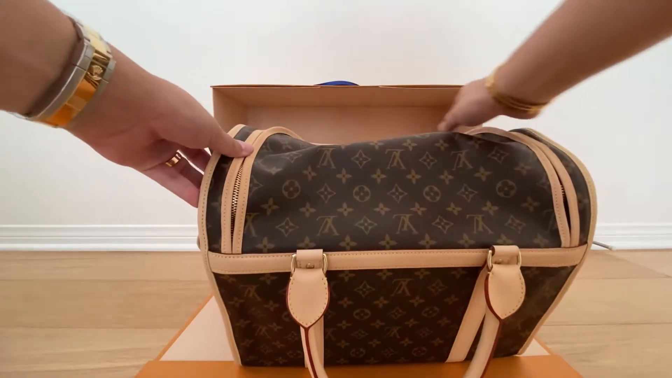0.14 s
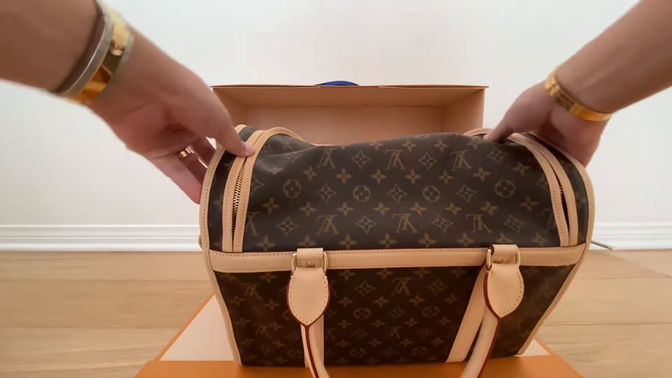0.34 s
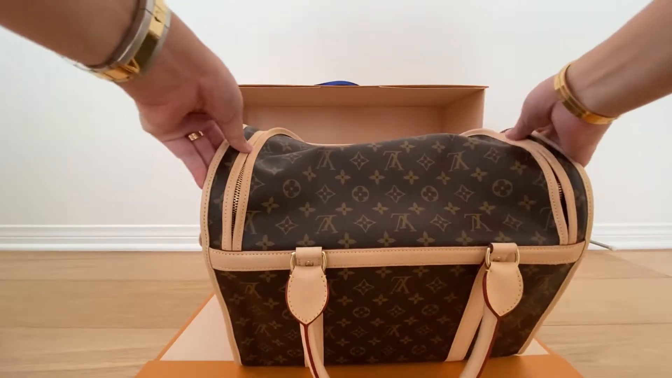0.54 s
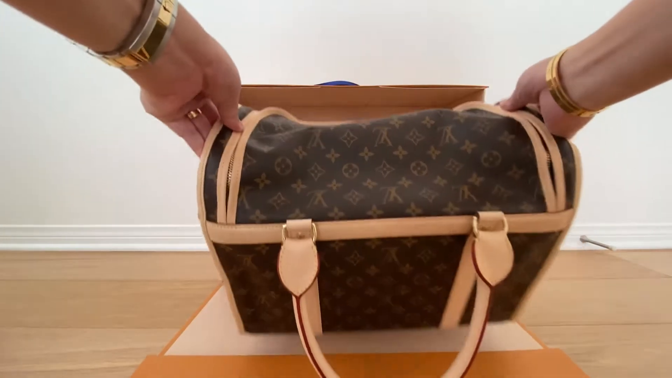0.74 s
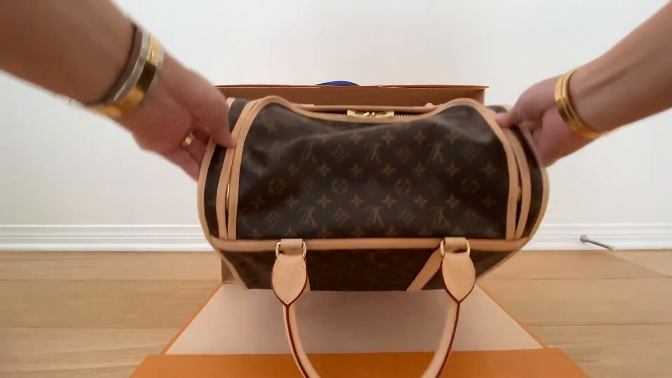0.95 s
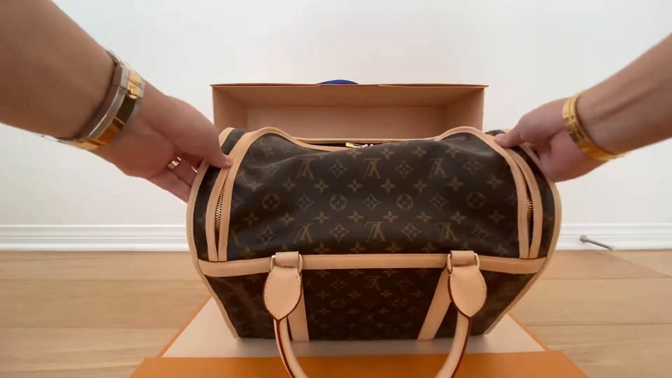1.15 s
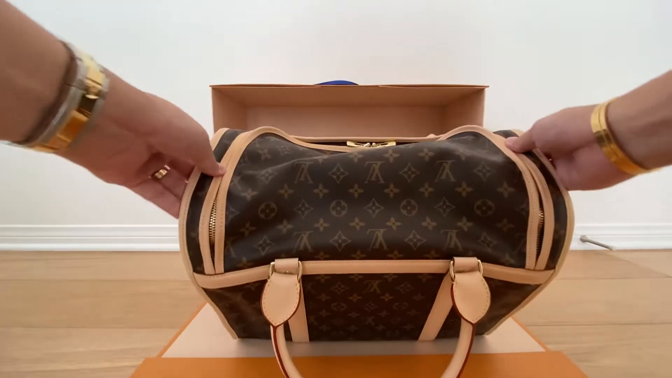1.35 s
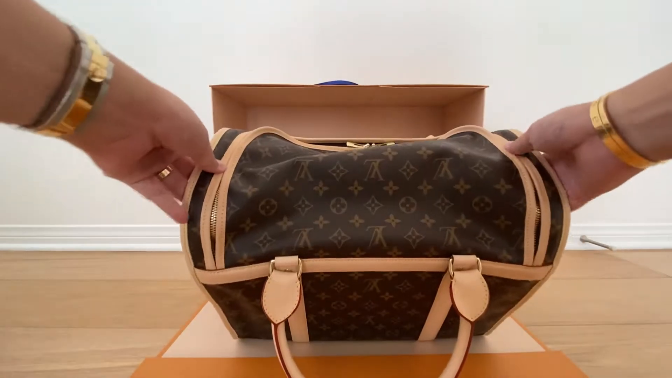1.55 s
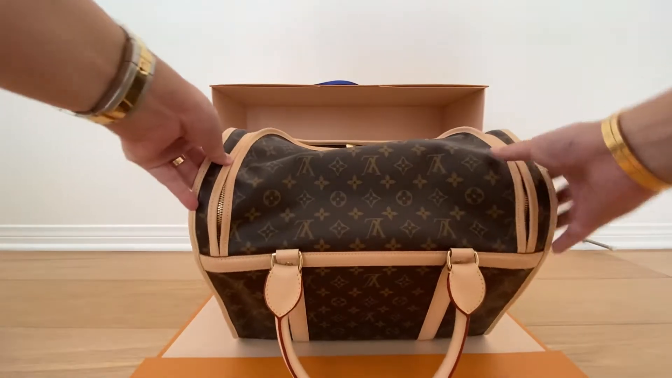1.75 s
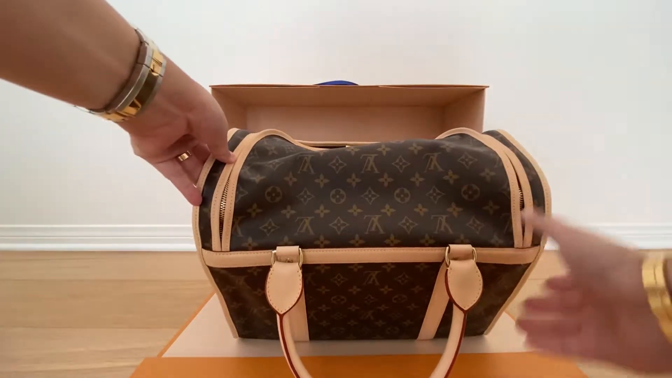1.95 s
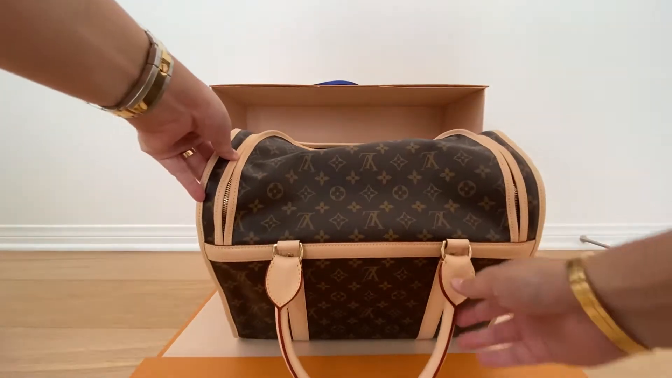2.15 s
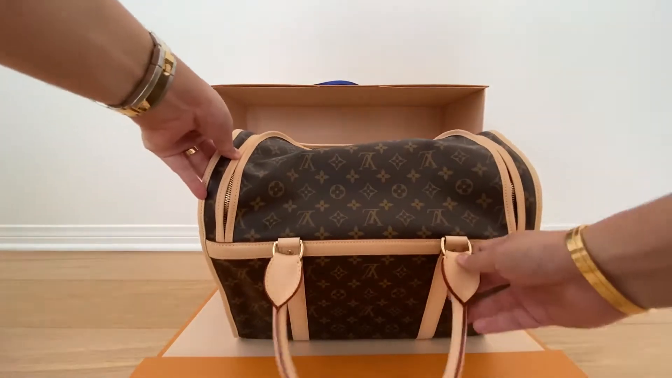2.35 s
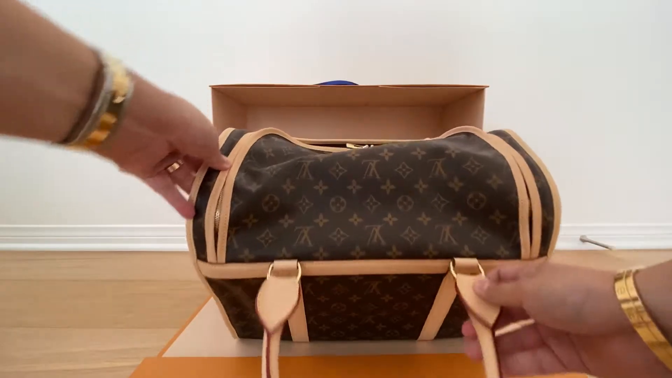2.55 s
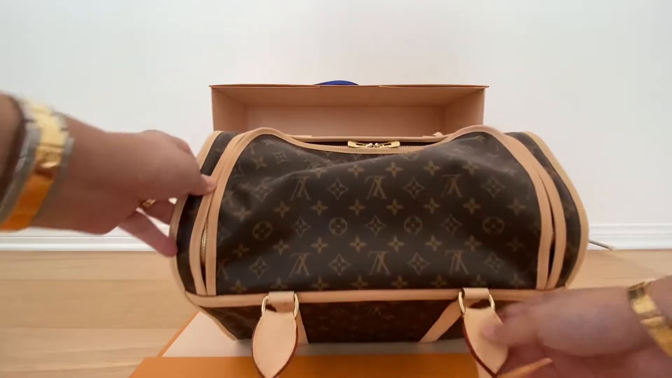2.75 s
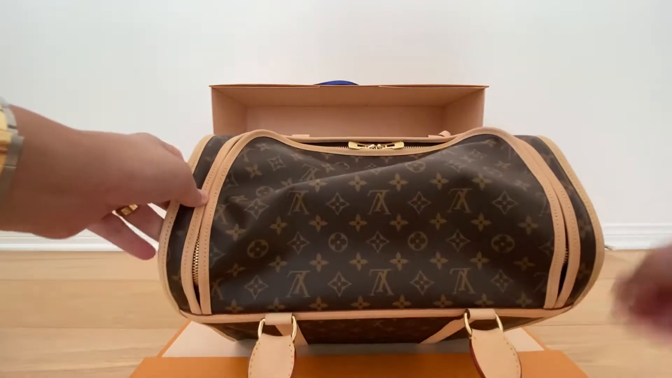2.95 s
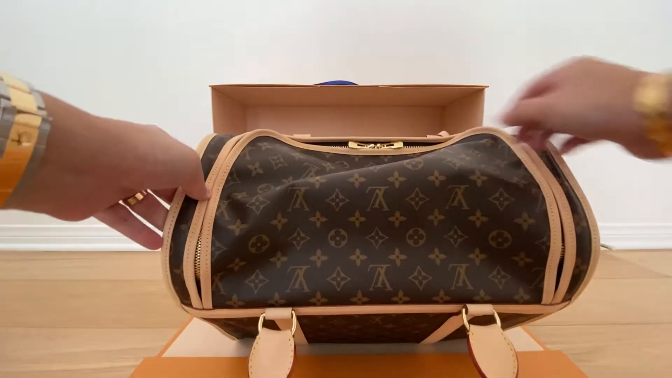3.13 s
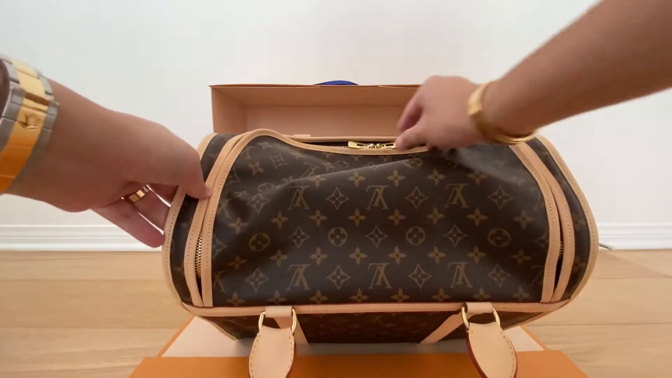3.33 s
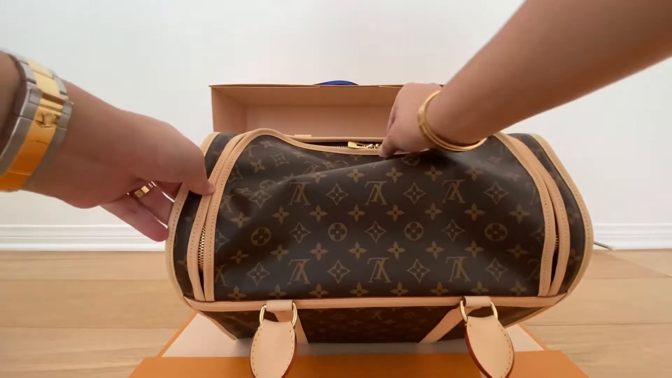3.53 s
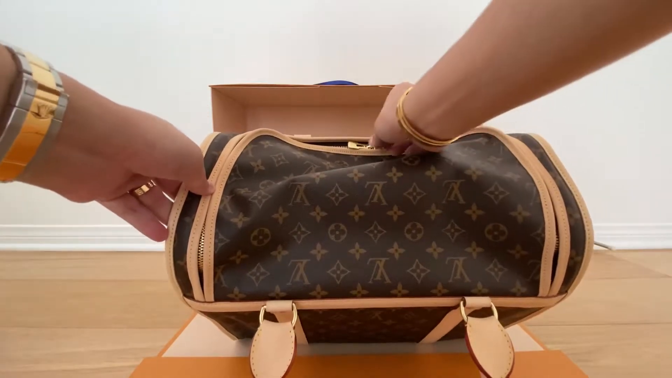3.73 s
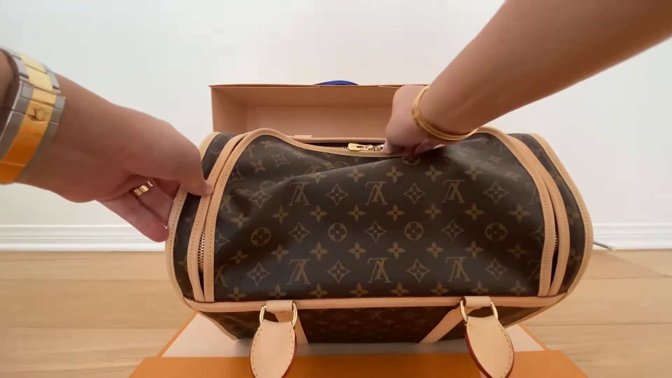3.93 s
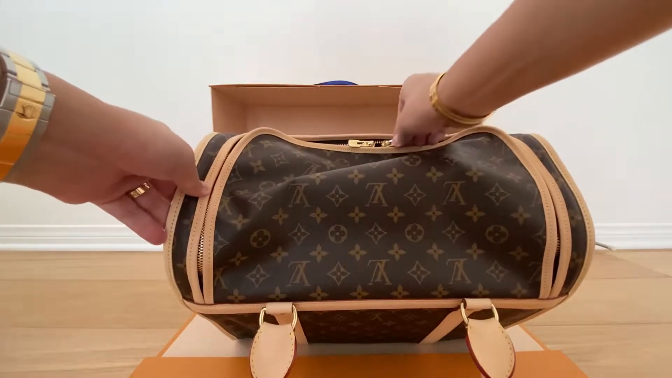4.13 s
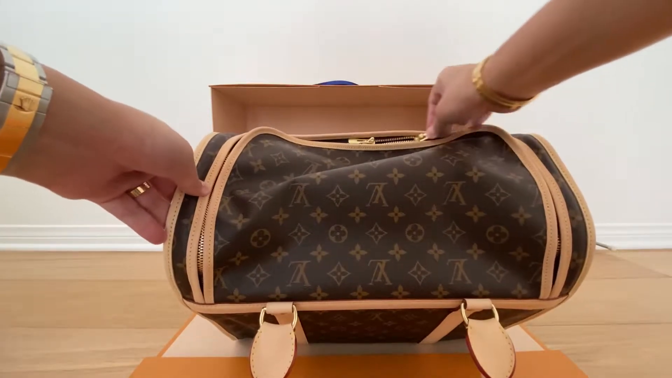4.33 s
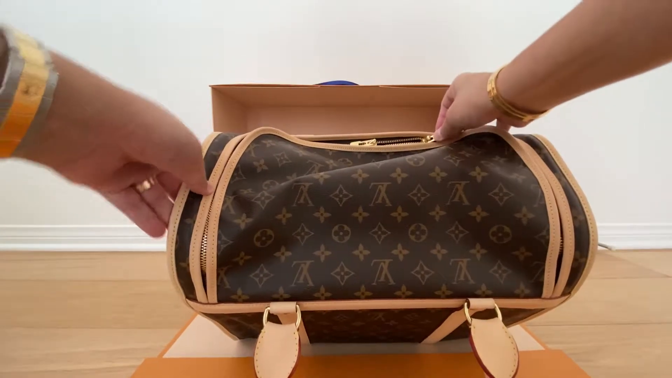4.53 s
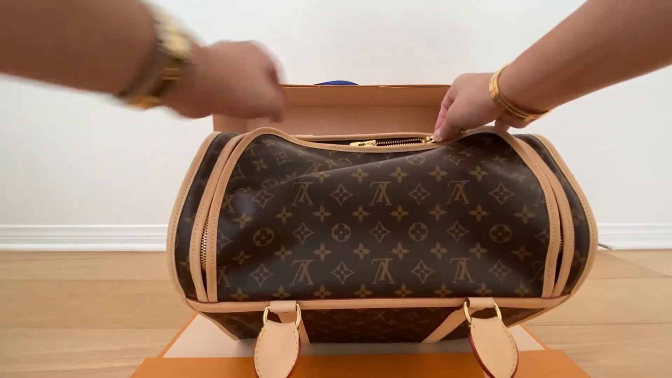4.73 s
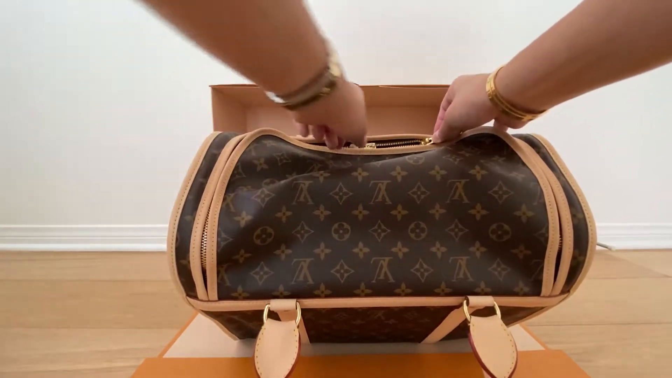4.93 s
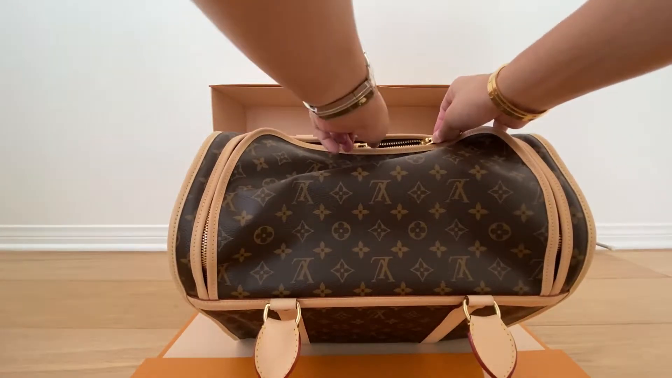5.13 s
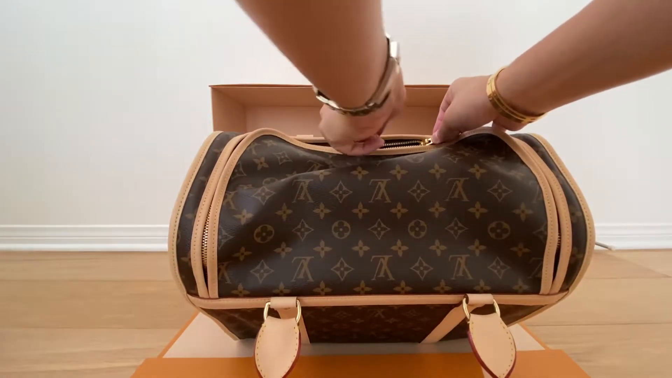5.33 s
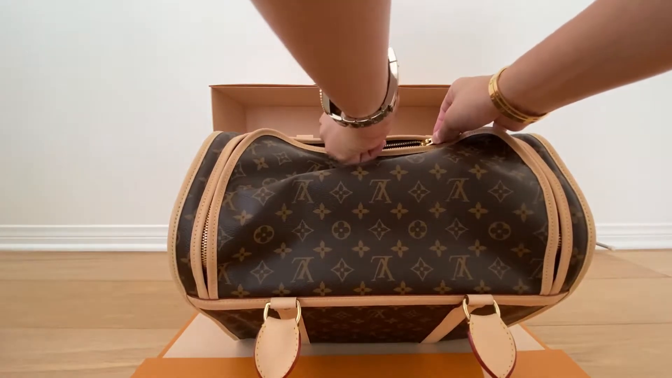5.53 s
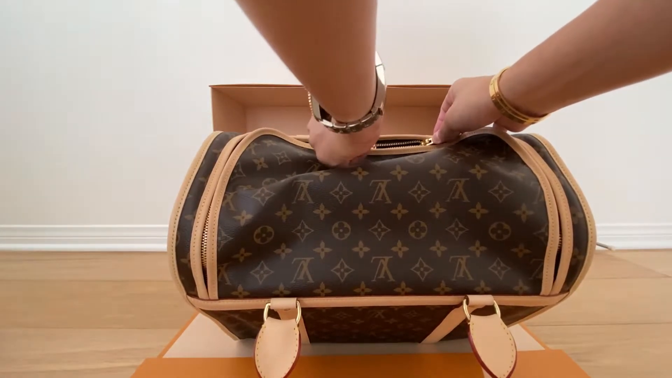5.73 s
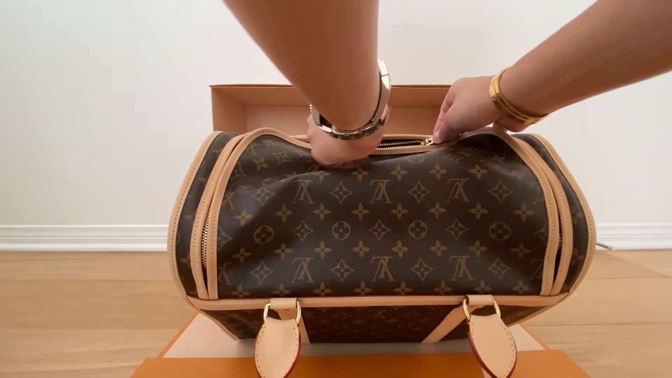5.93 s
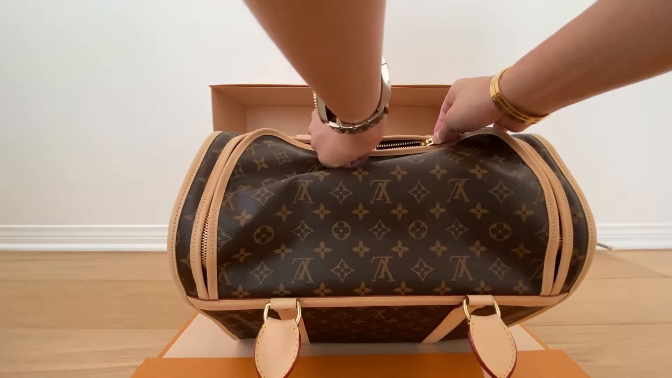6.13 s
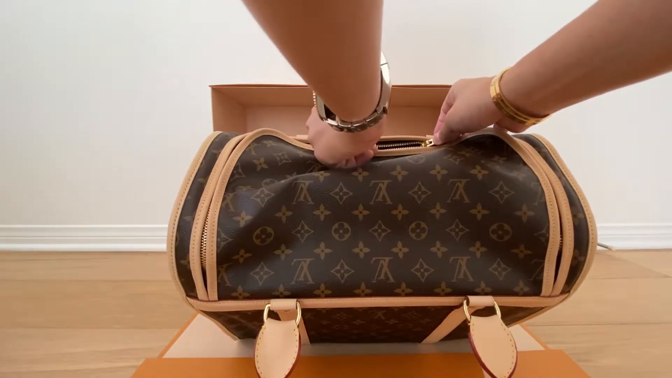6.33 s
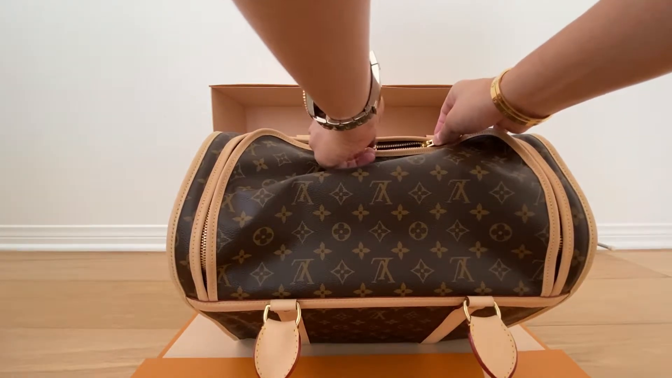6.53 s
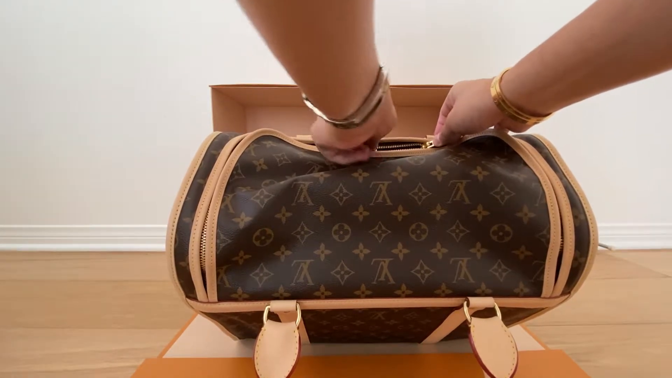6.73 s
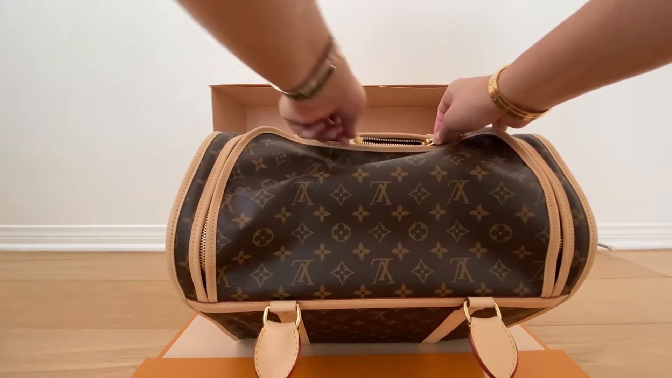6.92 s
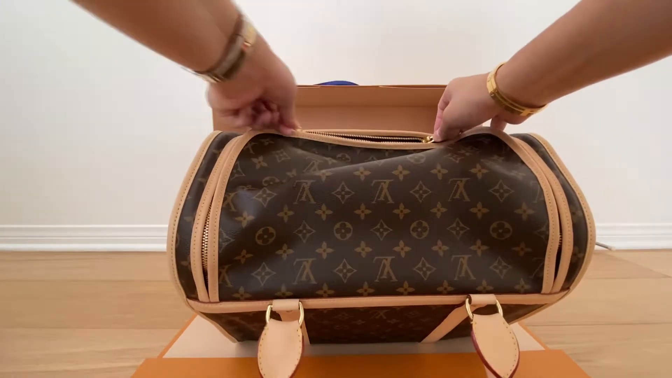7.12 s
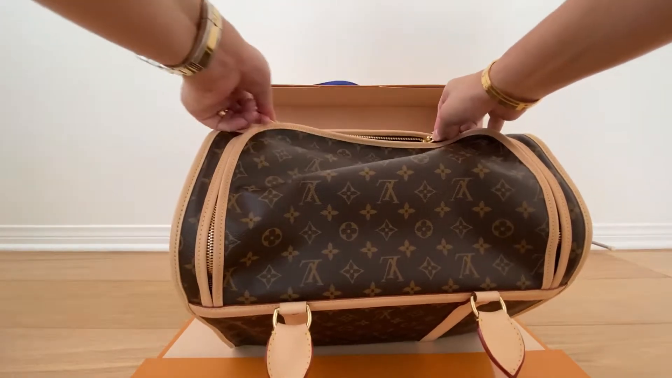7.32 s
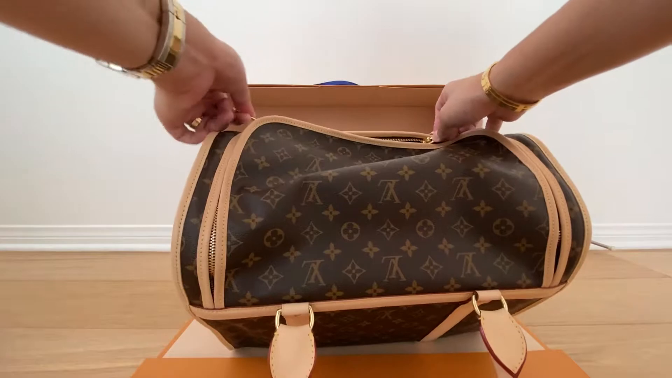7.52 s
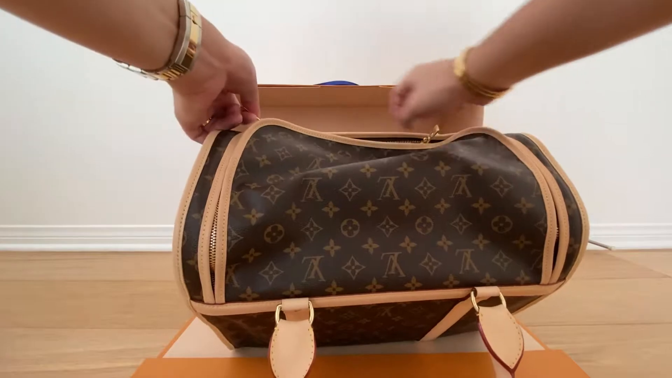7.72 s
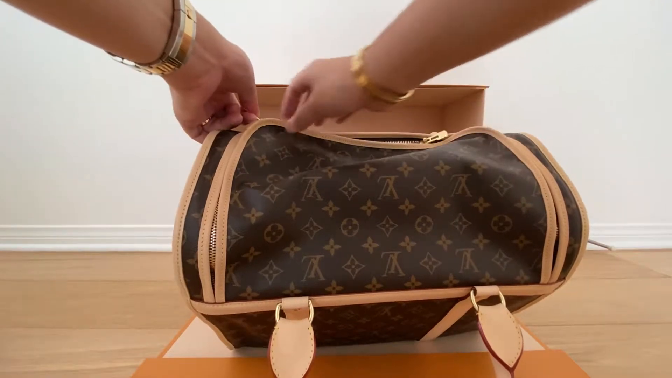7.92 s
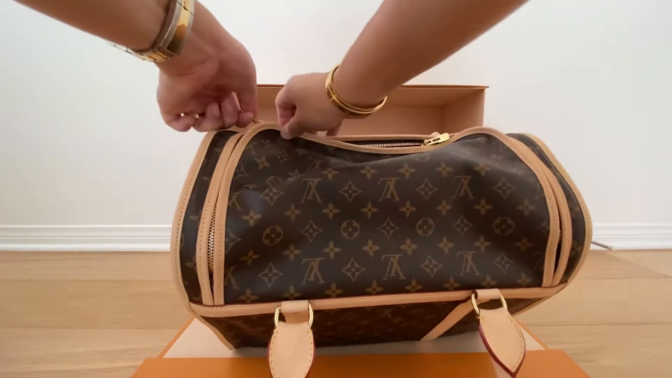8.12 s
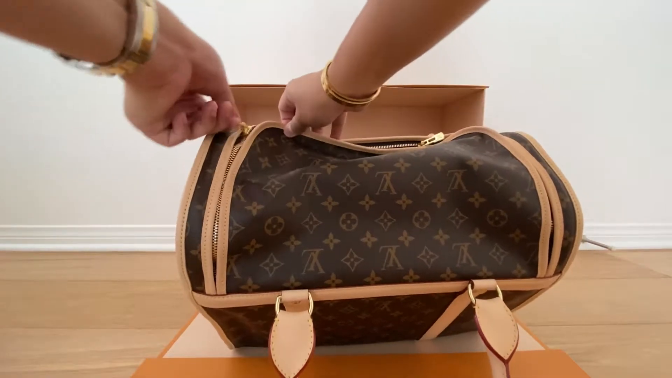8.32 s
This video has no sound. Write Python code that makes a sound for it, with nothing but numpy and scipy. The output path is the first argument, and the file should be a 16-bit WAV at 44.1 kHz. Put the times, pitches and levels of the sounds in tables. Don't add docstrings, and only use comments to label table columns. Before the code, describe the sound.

Close by in a bare, lightly echoing room, a stiff hollow bag is shifted on cardboard: soft bumps, two dull knocks as it tips and lands, then one sharp, ringing knock from a handle. Hands brush cloth and leather. A metal zipper is pulled slowly, teeth clicking, then after small brass ticks and pats come faster strokes and a last short one. Faint ventilation hums underneath.

```python
import sys
import numpy as np
from scipy import signal
from scipy.fft import rfft, irfft, next_fast_len
from scipy.io import wavfile
from scipy.ndimage import uniform_filter1d, map_coordinates

SR = 44100
rng = np.random.default_rng(int(sys.argv[2]) if len(sys.argv) > 2 else 0)


def generate_wav(sig):
    pcm = np.round(np.clip(np.atleast_2d(sig).T, -1, 1) * 32767).astype(np.int16)
    wavfile.write(sys.argv[1], SR, pcm)


def ratio_of_db(decibels):
    return 10 ** (np.asarray(decibels, float) / 20)


N = 373527
TIME = np.arange(N) / SR


def unit(x):
    return x / np.sqrt(np.mean(x ** 2) + 1e-20)


def along(points, hz):
    f, v = np.transpose(points)
    return np.interp(np.log(hz + 1), np.log(f + 1), v)


def gains(spans, fade=0.017):
    total = 0
    for rows in spans:
        s, *columns = np.transpose(rows)
        inside = np.minimum(TIME - s[0], s[-1] - TIME)
        edge = np.clip(inside / fade + 1, 0, 1)
        total = total + edge * ratio_of_db(np.array([np.interp(TIME, s, column) for column in columns]))
    return total


def bells(rows):
    out = np.zeros((len(rows[0]) - 2, N))
    for s, length, *db in rows:
        near = np.abs(TIME - s) < length
        fall_db = 11.0 * ((TIME[near] - s) / (length / 2)) ** 2
        out[:, near] += ratio_of_db(np.array(db)[:, None] - fall_db)
    return out


def wobble(rate):
    coarse = TIME[::16]
    knots = rng.standard_normal(int(N * rate / SR) + 4)
    return np.interp(TIME, coarse, map_coordinates(knots, [coarse * rate]))


def filtered(x, response):
    m = next_fast_len(len(x) + 8192)
    hz = np.fft.rfftfreq(m, 1 / SR)
    return irfft(rfft(x, m) * response(hz), m)[:len(x)]


def noise(spectrum, size=N):
    return unit(filtered(rng.standard_normal(size), lambda hz: ratio_of_db(along(spectrum, hz))))


def resonant(x, peaks):
    def response(f):
        total = 0
        for k, (centre, width, db) in enumerate(peaks):
            damping = 1j * f * width
            total = total + (-1) ** k * ratio_of_db(db) * damping / (centre * centre - f * f + damping)
        return total
    return filtered(x, response)


def ring(modes, attack, chance=1):
    longest = max(t60 for *_, t60 in modes)
    t = TIME[:min(SR // 2, round(1.5 * SR * longest))]
    total = 0
    for hz, db, t60 in modes:
        phase = 2 * np.pi * (hz * t + chance * rng.random())
        total = total + ratio_of_db(db - 60 * t / t60) * np.sin(phase)
    return (1 - np.exp(-t / attack)) * total


def add(track, s, sound):
    part = track[round(s * SR):][:len(sound)]
    part += sound[:len(part)]


# time in seconds, force in dB.
PULLS = [
    [(4.12, -89.5), (4.165, -60.5), (4.25, -61), (4.33, -58), (4.41, -59.5), (4.48, -75.5), (4.6, -72.5)],
    [(6.885, -64.5), (6.95, -59), (7.08, -53), (7.15, -59), (7.26, -63.5)],
    [(7.275, -59.5), (7.305, -52.5), (7.38, -62.5), (7.51, -61.5), (7.57, -95)],
    [(8.17, -66), (8.225, -53), (8.265, -58.5), (8.34, -57), (8.43, -64), (8.47, -49.5)],
]
# drum in dB, panel in dB, sway in dB.
COUPLING = [(5, -3, 4), (6, -1, -6.5), (5.5, 2, 4.5), (2, -2.5, 3.5)]
# time in seconds, teeth passed.
SLIDER_TRAVEL = [(4.12, -.9), (4.143, 0), (4.231, 6), (4.316, 14), (4.405, 22), (4.467, 26), (4.587, 32),
                 (6.889, 33), (6.979, 38), (7.105, 49), (7.207, 63), (7.316, 70), (7.383, 74), (7.46, 81),
                 (7.557, 86), (8.169, 87), (8.26, 94), (8.47, 113.5)]
# mode in Hz, width in Hz, level in dB.
DRUM_MODES = [(203, 54, 2.5), (279.7, 67, 3)]
DEEP_DRUM_DB = [-1, 2.5, -0.5, -0.5]
# mode in Hz, width in Hz, level in dB.
PANEL_MODES = [(546, 340, 5), (771, 39, 13), (1010, 1400, -9)]
# frequency in Hz, level in dB per Hz.
SWAY_COLOUR = [(30, -27), (50, -20.5), (70, -4.5), (110, -7.5), (150, -7.5), (220, -80.5)]


def zipper():
    spans = []
    for rows, coupling_db in zip(PULLS, COUPLING):
        spans.append([(s, db, *(db + np.array(coupling_db))) for s, db in rows])
    click, drum, panel, sway = gains(spans)
    travel = np.interp(TIME + 0.0025, *np.transpose(SLIDER_TRAVEL))
    teeth_per_s = uniform_filter1d(np.gradient(travel) * SR, size=1300)
    usual_teeth_per_s, drum_db_per_octave = 46, 1
    drum = drum * ratio_of_db(drum_db_per_octave * np.log2(np.clip(teeth_per_s, 30, None) / usual_teeth_per_s))
    sway = np.interp(TIME - 0.023, TIME, sway)

    passed = travel + 0.12 * wobble(60)
    teeth = np.diff(np.maximum.accumulate(np.floor(passed)), prepend=-1)
    push = unit(teeth * ratio_of_db(1.0 * rng.standard_normal(N)))
    push = push + 1.1 * rng.standard_normal(N)
    push = push + 0.41 * np.sin(4 * np.pi * passed)

    deep = ratio_of_db(np.interp(TIME, [rows[2][0] for rows in PULLS], DEEP_DRUM_DB))
    boom = deep * unit(resonant(push, DRUM_MODES[:1])) - unit(resonant(push, DRUM_MODES[1:]))
    top_panel = unit(resonant(resonant(push, PANEL_MODES), [(790, 600, 0)]))
    body = 0.77 * drum * boom + panel * top_panel
    return chatter(click) + pings() + ratio_of_db(-5.0) * body + ratio_of_db(-3.5) * sway * noise(SWAY_COLOUR)


# time in seconds, peak in dB.
TEETH = [
    [(4.1096, -65), (4.118, -72.5), (4.1407, -64.5), (4.1559, -67), (4.1661, -54), (4.1834, -53.5),
     (4.2011, -57), (4.2146, -54.5), (4.2294, -49), (4.2402, -49.5), (4.2475, -47), (4.2571, -50.5),
     (4.2677, -48), (4.2752, -49), (4.2857, -50), (4.2977, -54.5), (4.3059, -45.5), (4.3141, -45.5),
     (4.3229, -48.5), (4.334, -55.5), (4.3522, -47), (4.3674, -48), (4.3774, -47), (4.3915, -55),
     (4.4025, -43.5), (4.4175, -56), (4.4268, -60.5), (4.4378, -62), (4.4448, -61), (4.4651, -66.5),
     (4.4822, -60), (4.5103, -63), (4.5239, -61.5), (4.5523, -73), (4.5642, -62), (4.5768, -74),
     (4.5849, -68)],
    [(6.8865, -55), (6.9034, -64), (6.9173, -56), (6.94, -64), (6.9774, -54), (6.9875, -49), (7.0005, -51),
     (7.0216, -46.5), (7.0389, -48), (7.0586, -42.5), (7.0749, -46), (7.0968, -44), (7.1111, -51.5),
     (7.1288, -60), (7.14, -62.5), (7.1499, -54), (7.1572, -65), (7.1647, -57), (7.1833, -57),
     (7.1919, -48), (7.2003, -60), (7.2217, -65), (7.2432, -60)],
    [(7.2626, -59), (7.2779, -64), (7.2903, -52), (7.3017, -55), (7.3136, -59), (7.325, -49),
     (7.3341, -48.5), (7.3507, -48.5), (7.3662, -44.5), (7.3808, -49.5), (7.3971, -50.5), (7.4154, -59),
     (7.428, -47), (7.4391, -50), (7.4584, -58), (7.4794, -48), (7.4941, -54), (7.517, -67), (7.5324, -70),
     (7.5394, -73.5), (7.5566, -74), (7.5689, -74.5)],
    [(8.1668, -76), (8.1799, -64.5), (8.1868, -54), (8.1981, -73), (8.2098, -60), (8.2206, -43),
     (8.2366, -46), (8.2448, -45), (8.2584, -42.5), (8.2688, -44.5), (8.2782, -47.5), (8.2984, -46),
     (8.3141, -52), (8.3275, -59), (8.3358, -60), (8.3514, -50), (8.3657, -63), (8.3829, -59),
     (8.3922, -53), (8.4036, -57), (8.4174, -60), (8.4286, -49.5)],
]
# frequency in Hz, level in dB per Hz.
METAL_COLOUR = [(530, 29), (900, 10), (1120, 1), (1470, -1), (2390, -4), (2730, -8), (2960, -6),
                (4360, -11), (7140, -11), (14200, -16), (16000, -15)]
PARTS_HZ = [1500, 3500, 6000, 12400]
TOOTH_SHARE_DB = [-4.5, -7, 0, -5]
STROKE_COLOUR = [(-1.4, -1.4, -2, 4), (-0.34, 0.97, -2.5, 4), (1, -0.69, -5.5, -2), (-1.5, 0.82, -0.5, 0.5)]
SCRAPE_DB = [-7.5, -1.5, -6, -6.5]


def chatter(pull):
    t = TIME[:2000]
    burst = (1 - np.exp(-t / 0.00066)) * ratio_of_db(-60 * t / 0.024)
    burst = burst / burst.max()
    s, db = np.concatenate(TEETH).T
    places = np.round(s * SR).astype(int)
    scatter_db = 2.5 * rng.standard_normal((len(s), len(PARTS_HZ)))
    middles = [np.mean(rows, axis=0)[0] for rows in PULLS]
    grit_db = 1.5 * wobble(350)
    scrape = pull * ratio_of_db(np.interp(TIME, middles, SCRAPE_DB) + grit_db)

    metal = noise(METAL_COLOUR)
    bands = [filtered(metal, lambda hz: np.exp(-(np.log(hz / centre + 1e-9) / 0.6) ** 2)) for centre in PARTS_HZ]
    out = 0
    for band, share_db, colour_db, own_db in zip(bands, TOOTH_SHARE_DB, np.transpose(STROKE_COLOUR), scatter_db.T):
        hits = np.bincount(places, ratio_of_db(db + 1 + share_db + own_db), N)
        clicks = signal.oaconvolve(hits, burst)[:N]
        level = np.hypot(clicks, scrape * ratio_of_db(1.3 * wobble(40)))
        out = out + level * ratio_of_db(np.interp(TIME, middles, colour_db)) * band
    return out / np.std(sum(bands))


PING_HZ = [8200, 6950, 6330, 5470]
PING_DB = [-11, -11, -2.5, -3]


def pings():
    out, t = np.zeros(N), TIME[:1500]
    spread, t60 = 0.12, 0.015
    for rows, hz, ring_db in zip(TEETH, PING_HZ, PING_DB):
        chances = rng.standard_normal((len(rows), 2))
        for (s, db), (bend, own) in zip(rows, chances):
            pitch = hz * np.exp(spread * bend)
            tone = np.sin(2 * np.pi * pitch * t) * (1 - np.exp(-t / 0.00061))
            add(out, s, ratio_of_db(db + ring_db + 1.9 * own - 60 * t / t60) * tone)
    return out


# start in seconds, peak in dB, rise of the blow in seconds, ring in dB, thud in dB.
KNOCKS = [
    (0.9733, -29.5, 0.001, -4, -33.5),
    (1.1195, -27, 0.0013, 2.5, -27),
    (2.6521, -18, 0.0006, 4, -38),
    (5.6237, -34, 0.00094, -9, -48.5),
]
# frequency in Hz, level in dB per Hz.
BLOW_COLOURS = [
    [(210, -27), (350, -11), (653, -9), (1240, -7), (1380, -2), (2750, -27), (13400, -52), (16000, -70)],
    [(210, -24), (350, -10.5), (791, -17.5), (1480, -17), (2500, -18), (2940, -28.5), (3450, -23.5),
     (16000, -45.5)],
    [(210, -35.5), (350, -20), (664, -8.5), (871, -16), (1700, -8), (2000, -11.5), (4180, -14.5),
     (12000, -37), (16000, -42)],
    [(210, -40), (350, -18), (791, -5), (1680, -15), (2030, -6.5), (3730, -18.5), (7080, -4), (16000, -21)],
]
# mode in Hz, level in dB, t60 in seconds.
KNOCK_RINGS = [
    [(1120, 6, 0.02), (1410, 8, 0.014), (2230, 5, 0.015)],
    [(1530, 9, 0.022), (2150, 1.5, 0.024), (2920, 2, 0.022), (4120, 0, 0.014), (4600, -6.5, .02)],
    [(614, -8.5, 0.02), (1230, -13, 0.022), (1500, 2, 0.024), (1630, 1.5, .026), (1788, -6, 0.018),
     (2200, -7, 0.02), (2530, -8, .025), (2962, -7.5, .022), (4120, -7.5, 0.0066), (1250, -32, 0.5),
     (1440, -36, .4), (1560, -35.5, .5)],
    [(6040, 11, 0.02), (4440, 0, 0.018), (8900, 0, .02), (7500, -14, 0.1), (7400, -22.5, .35),
     (6900, -23, .4), (5990, -20, 0.54), (6120, -22, .3), (10300, 13, 0.027)],
]
# frequency in Hz, level in dB per Hz.
ANSWER_COLOURS = [
    [(180, -16), (300, 0), (645, -9.5), (1390, -3), (2000, -18), (2250, -17.5), (12700, -50),
     (16000, -57.5)],
    [(180, -30), (300, 4), (701, -9.5), (1300, -9), (1510, -8), (4670, -18.5), (13300, -37.5), (16000, -41)],
    [(180, -37), (300, -2), (366, -20), (462, -4.5), (1120, -20), (1230, -3.5), (1560, -4), (1970, -9),
     (14000, -45), (16000, -61.5)],
    [(250, -38), (400, -1), (850, -7.5), (3500, -19.5), (5800, -11.5), (6100, -10), (6500, -22), (6900, -3),
     (7700, -4.5), (8200, -13.5), (16000, -21.5)],
]
ANSWER_DB = [-43, -38, -34, -47.5]
REBOUND_S = [.002, .003, .0032, 0.0014]
REBOUND_DB = [3, 5, 1, 3]
# mode in Hz, level in dB, t60 in seconds.
THUD_MODES = [(64.5, -8.5, 0.19), (105, -8.5, 0.097), (194.2, 3.5, 0.061), (281, 4.5, 0.0575)]


def knocks():
    out, thuds, t = np.zeros(N), np.zeros(N), TIME[:SR // 2]
    nearest_wall = (0.014, -20.5)  # seconds, dB
    for (s, db, rise, ring_db, thud_db), colour, modes, echo, echo_db, again_s, again_db in zip(
            KNOCKS, BLOW_COLOURS, KNOCK_RINGS, ANSWER_COLOURS, ANSWER_DB, REBOUND_S, REBOUND_DB):
        shape = (t / rise) ** 0.34 * np.exp(-t / (1.1 * rise + 0.0017))
        blow = shape * noise(colour, size=len(t))
        for after_s, gain_db in ((0, 0), (again_s, again_db), nearest_wall):
            add(out, s + after_s, ratio_of_db(db - 5.0 + gain_db) * blow)
            add(out, s + after_s, ratio_of_db(db - 6.0 + gain_db + ring_db) * ring(modes, attack=rise, chance=0))
        add(out, s + 0.0082, ratio_of_db(echo_db) * answer(echo))
        thud = ratio_of_db(thud_db - 3.0) * ring(THUD_MODES, attack=0.0026)
        add(thuds, s + 0.004 + 2.5 * rise, thud)
    return out, thuds


# start in seconds, peak in dB, mode in Hz, t60 in seconds.
BUMPS = [(0.09, -37, 274, 0.016), (0.151, -45.5, 278, 0.032), (0.389, -45, 82.6, 0.13),
         (0.46, -53, 232, 0.075), (0.867, -51, 362, 0.058), (1.13, -36.5, 69.5, 0.1),
         (1.25, -57, 77.4, 0.29), (2.579, -59.5, 385, 0.27), (3.254, -49, 250, 0.2),
         (3.325, -45.5, 203, 0.14), (3.612, -55.5, 241, 0.12), (3.788, -54, 390, 0.076),
         (4.575, -45.5, 240, 0.038), (4.666, -64.5, 337, 0.11), (4.923, -57.5, 206, 0.072),
         (5.617, -46.5, 258, 0.15), (5.965, -49.5, 284, 0.12), (6.122, -59, 380, 0.13),
         (6.281, -47.5, 242, 0.065), (6.484, -44.5, 254, 0.057), (6.541, -56.5, 379, 0.11),
         (6.858, -56.5, 221, 0.16), (7.714, -53.5, 86.6, 0.1), (7.944, -61, 367, 0.089)]


def bumps():
    out = np.zeros(N)
    for s, db, hz, t60 in BUMPS:
        modes = [(hz, 0, t60), (hz * 1.37, -7, t60 * 0.52)]
        add(out, s, ratio_of_db(db + 1.0) * ring(modes, attack=0.0011))
    return out


# time in seconds, effort in dB.
HANDLING = [(0, -66.5), (.5, -75.5), (.93, -66), (1.35, -83), (1.66, -72.5), (1.95, -76.5), (2.55, -71),
            (3.1, -74.5), (3.9, -73.5), (4.7, -77), (5.2, -71), (5.55, -76), (6, -73), (6.35, -79),
            (6.85, -66.5), (7.6, -65.5), (7.93, -83), (8.2, -70)]
# middle in seconds, length in seconds, creak in dB, sway in dB.
SQUEEZES = [(.03, 0.17, -74, -76), (.46, 0.29, -63, -67), (1.33, 0.5, -65.5, -69), (2.22, 0.35, -93, -77),
            (3.36, 0.2, -64, -66), (3.8, 0.25, -70, -90), (4.1, 0.094, -69, -79), (4.98, 0.14, -70, -88.5),
            (5.3, 0.12, -73, -93), (6.02, 0.1, -67, -75.5), (6.5, 0.1, -62, -77.5), (7.75, 0.23, -66, -89),
            (8.04, 0.19, -61, -71.5)]
# middle in seconds, length in seconds, level in dB.
BRUSHES = [(0.375, 0.14, -68), (0.552, 0.17, -63.5), (.87, 0.14, -58), (1.03, .16, -81),
           (1.664, 0.52, -70.5), (2.318, 0.11, -64), (3.265, 0.033, -68), (3.363, 0.128, -69),
           (3.5, 0.42, -78), (4.03, 0.12, -76), (6.02, 0.12, -80), (6.576, 0.1, -69), (8.06, 0.2, -69)]
# frequency in Hz, level in dB per Hz.
CLOTH_COLOUR = [(410, -52), (700, 7.5), (1120, -3), (1280, 1), (2220, -1), (2800, -4), (7590, -6.5),
                (14200, -22), (16000, -23.5)]
# middle in seconds, length in seconds, level in dB.
WHISKS = [(.55, .12, -72), (1.57, .08, -74), (1.67, .1, -70), (2.8, 0.22, -72), (3.62, 0.087, -74),
          (6.57, .1, -77), (6.89, .05, -70), (8.05, 0.11, -70)]
# frequency in Hz, level in dB per Hz.
LEATHER_COLOUR = [(2500, -21), (6000, -4.5), (9000, -5), (14000, -0.5), (16000, -4.5)]


def hands():
    effort, = gains([HANDLING])
    creak, sway = effort * ratio_of_db([[-1], [-2]]) + bells(SQUEEZES)
    rub = effort + bells(BRUSHES)[0]
    grains = unit(ratio_of_db(1.4 * wobble(97) + 1.4 * wobble(15)) * noise(CLOTH_COLOUR))
    lumps = unit(ratio_of_db(5.9 * wobble(25)) * resonant(rng.standard_normal(N), DRUM_MODES))
    whisk = bells(WHISKS)[0] * ratio_of_db(1.9 * wobble(60)) * noise(LEATHER_COLOUR)
    return whisk + ratio_of_db(-5.0) * rub * grains + creak * lumps + sway * noise(SWAY_COLOUR)


# start in seconds, peak in dB, ring in Hz, level below 2.5 kHz in dB.
TAB_TICKS = [(1.3284, -58.5, 7200, -12), (1.372, -62, 7100, -10), (1.38, -65, 14060, -15),
             (1.7972, -62, 1620, -10), (3.6053, -54.5, 1560, -1.5), (3.9917, -53.5, 2430, 2.5),
             (4.9947, -60, 6090, 6.5), (5.1, -55.5, 10400, -11), (5.0995, -56, 3060, 7.5),
             (5.238, -70, 9940, -11.5), (5.282, -64, 4000, -15), (5.325, -69, 9900, -6),
             (5.3284, -61.5, 5940, 0), (5.6145, -48.5, 10000, 10), (5.9698, -58.5, 6080, 4),
             (6.172, -73, 7050, -12), (6.305, -61.5, 1700, 9.5), (6.2876, -52, 2200, 6),
             (6.531, -55, 2140, 9.5), (6.545, -51, 4200, 6.5), (6.8076, -56, 4100, -5),
             (6.847, -67, 12100, -2.5), (6.8695, -44.5, 2060, 0), (7.7133, -51, 2280, 0.5),
             (7.722, -70, 10000, -6), (7.9798, -56, 4200, 3), (8.4525, -44.5, 4820, -18.5)]
RING_TICKS = [(.0927, -61, 3380, 10.5), (.1471, -57, 1870, 5), (.8646, -47, 2410, -2),
              (1.113, -51, 3760, 12), (1.9577, -56, 1710, -3), (2.127, -68, 1750, 1),
              (2.1534, -60.5, 1760, .5), (2.496, -62, 4060, -13), (2.626, -63.5, 1500, 17),
              (2.6415, -43, 3900, -2), (2.647, -37, 3900, -8), (2.775, -57, 2510, -2), (2.8, -51, 2250, -9),
              (2.89, -57, 1570, 1), (4.0297, -56, 3360, -10.5), (4.585, -56.5, 1750, 0.5),
              (4.925, -66, 2250, -0.5), (5.195, -65, 2490, 1), (5.3143, -56.5, 2320, 1.5),
              (5.9357, -63, 4410, 5), (6.664, -62, 3500, -4), (6.6792, -54, 4400, 7.5),
              (7.6899, -50.5, 4500, -9)]
NAIL_TICKS = [
    (3.7176, -55, 1600, 14),
    (5.6, -80.5, 1190, 12),
]
# mode in Hz, level in dB, t60 in seconds.
TAB_MODES = [(6060, -2, .11), (9050, -6, .1), (9990, -2, .07)]


def ticks(rows, high_db, t60, echo_db):
    out, t = np.zeros(N), TIME[:SR // 4]
    echo_colour = [(100, -4.0), (9000, -8.0), (16000, -6.5)]
    for s, db, hz, low_db in rows:
        colour = [(300, -24.0), (650, low_db + 9.5), (2200, low_db - 2.5), (3000, 1.5), (7500, -3.0),
                  (8500, high_db), (12000, high_db + 8.0), (16000, high_db - 13.0)]

        def shape(f):
            peak = 1 + 1.8 / (1 + ((f - hz) / (0.1 * hz)) ** 2)
            return ratio_of_db(along(colour, f)) * peak

        envelope = (1 - np.exp(-t / 0.0009)) * ratio_of_db(-60 * t / t60)
        crack = ratio_of_db(1.5) * rng.standard_normal(len(t)) * envelope
        add(crack, 0.0069, ratio_of_db(echo_db) * answer(echo_colour, size=len(t)))
        add(out, s, ratio_of_db(db) * filtered(crack, shape))
        add(out, s, ratio_of_db(db - 6) * ring([(hz, 0, 0.023)], attack=0.001))
        if 5500 < hz < 7000:
            add(out, s, ratio_of_db(db - 9.5) * ring(TAB_MODES, attack=0.00083))
    return out


# start in seconds, level in dB, partial in Hz.
CLINKS = [(4.995, -58, 2150), (4.995, -64.5, 3120), (5.099, -56, 6080), (5.0995, -59, 5200),
          (6.534, -60.5, 2420), (6.541, -65, 6120), (6.546, -50, 3260), (6.547, -69, 2000),
          (6.671, -62, 3070), (6.8085, -60, 5670), (6.8695, -49, 3210), (6.8695, -50, 10500),
          (7.717, -58, 3200), (5.325, -61, 10100)]


def clinks():
    out = np.zeros(N)
    for s, db, hz in CLINKS:
        add(out, s, ring([(hz, db, 0.022)], attack=0.00043))
    return out


# start in seconds, level in dB, pitch in Hz, t60 in seconds.
TREMBLES = [(2.773, -59, 2590, .25), (4.997, -74, 6020, .2), (4.997, -70, 3050, 0.068),
            (5.013, -77, 2600, 0.091), (5.33, -77.5, 6050, 0.19), (5.64, -68, 7300, 0.43),
            (5.64, -70, 6100, 0.61), (6.292, -70, 1724, 0.37), (6.292, -72.5, 2314, .3),
            (6.55, -75, 3740, .2), (6.69, -72, 2200, 0.33), (7.725, -78.5, 4600, 0.16),
            (7.98, -83, 2600, 0.16)]


def trembles():
    out = np.zeros(N)
    all_bends = rng.standard_normal((len(TREMBLES), 4))
    for (s, db, hz, t60), bends in zip(TREMBLES, all_bends):
        cluster = [(hz * np.exp(0.022 * bend), db, t60) for bend in bends]
        add(out, s, ring(cluster, attack=0.0037))
    return out


# start in seconds, length in seconds, first pitch in Hz, last pitch in Hz, level in dB.
SQUEAKS = [(2.319, .03, 5700, 6000, -78), (2.35, .022, 5950, 5510, -76), (2.384, 0.037, 5200, 4750, -74),
           (2.452, 0.023, 4800, 5030, -78), (2.52, 0.024, 5000, 4640, -78), (2.576, .024, 4840, 5184, -72),
           (2.617, .027, 5200, 4850, -72)]


def squeaks():
    times, pitches, swells = [], [], []
    for s, length, first, last, db in SQUEAKS:
        times += [s, s + length]
        pitches += [first, last]
        swells.append((s + length / 2, 1.5 * length, db - 0.5))
    grip = wobble(150)
    hz = np.interp(TIME, times, pitches) + 20 * grip
    tone = ratio_of_db(3.5 * grip - 1.0) * np.sin(2 * np.pi * np.cumsum(hz) / SR)
    return bells(swells)[0] * tone


# frequency in Hz, t60 in seconds.
ROOM_T60 = [(100, 0.52), (400, 0.21), (950, 0.43), (1300, 0.51), (1900, 0.43), (5500, 0.43), (7200, 0.38),
            (15000, 0.29)]


def answer(spectrum, size=SR * 3 // 4):
    hz, t, z = signal.stft(noise(spectrum, size=size), SR, nperseg=512)
    fall_db = -60 * t / along(ROOM_T60, hz)[:, None]
    ripple_db = 1.2 * rng.standard_normal((len(hz), 1))
    clumps = uniform_filter1d(rng.standard_normal(z.shape), size=6, axis=0)
    ripple_db = ripple_db + 6 * uniform_filter1d(clumps, size=3, axis=1)
    decay = ratio_of_db(fall_db) + 0.12 * ratio_of_db(0.35 * fall_db)
    tail = signal.istft(z * ratio_of_db(ripple_db) * decay, SR, nperseg=512)[1]
    return tail * (1 - np.exp(-TIME[:len(tail)] / 0.001713))


def room(x):
    out = np.zeros(N)
    step = round(0.6 * SR)
    for start in range(0, N, step):
        tail = answer([(20, 0), (20000, 0)], size=SR // 2)
        tail = tail / np.linalg.norm(tail)
        add(out, start / SR + 0.009, signal.fftconvolve(x[start:start + step], tail))
    return out


# frequency in Hz, level in dB per Hz.
AIR_COLOUR = [(15, -73.5), (25, -50), (72, -1.5), (108, -21.5), (130, -1.5), (326, -35.5), (363, 5),
              (416, -9), (659, -8.5), (1100, -23), (1650, -26), (1790, -26), (2160, -27), (14000, -33.5),
              (16000, -36)]
# hum in Hz, width in Hz, level in dB.
HUM_MODES = [(140, 23, -12), (374.8, 63, -7.5), (504, 40, -5), (691, 47, -8.5)]


def air():
    air_db = -63
    hum = unit(resonant(rng.standard_normal(N), HUM_MODES)) * ratio_of_db(0.842 * wobble(5.7))
    hiss = noise(AIR_COLOUR) * ratio_of_db(0.6 * wobble(4.6))
    return ratio_of_db(air_db - 3.5) * hiss + ratio_of_db(air_db - 6.0) * hum


def scene():
    dragged = zipper()
    blows, thuds = knocks()
    soft = thuds + bumps()
    small = ticks(TAB_TICKS, high_db=-7.5, t60=0.029, echo_db=-17)
    small = small + ticks(RING_TICKS, high_db=-18.5, t60=0.025, echo_db=-16)
    small = small + ticks(NAIL_TICKS, high_db=-18.5, t60=0.025, echo_db=-31)
    small = small + clinks() + trembles()
    walls = room(ratio_of_db(-3.0) * soft + ratio_of_db(-1.5) * dragged)
    mix = dragged + blows + soft + hands() + small + squeaks() + walls + air()
    return mix[None]


def low_pass(x):
    return signal.sosfilt(signal.butter(12, 16430, fs=SR, output="sos"), x)


def record(dry):
    def microphone(hz):
        f = hz / 45
        return (hz < 15800) * (1j * f) ** 2 / (1 + 1.4j * f - f ** 2)
    heard = filtered(dry[0], microphone)
    return low_pass(heard[None])


dry = scene()
out = record(dry)
generate_wav(out)
```